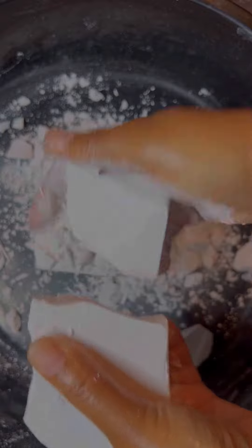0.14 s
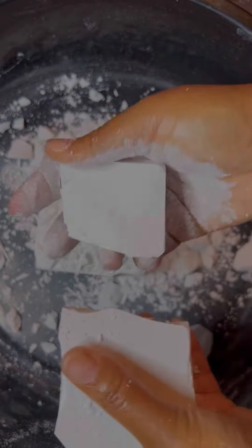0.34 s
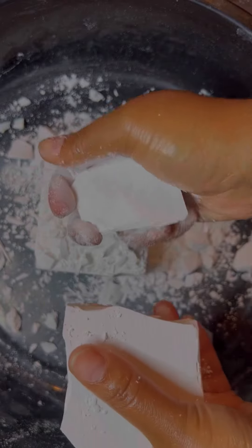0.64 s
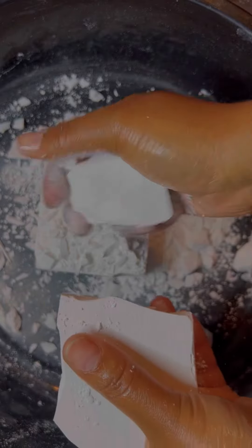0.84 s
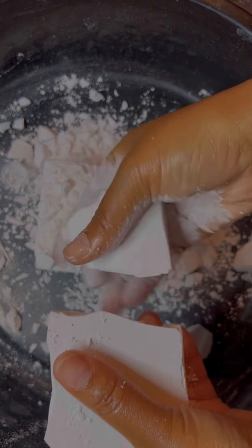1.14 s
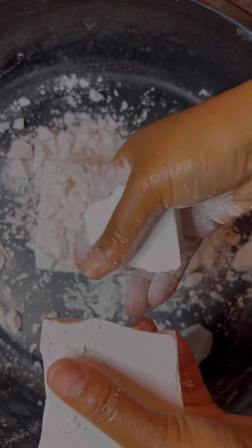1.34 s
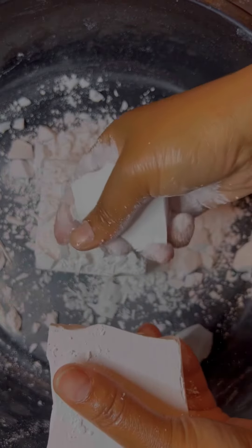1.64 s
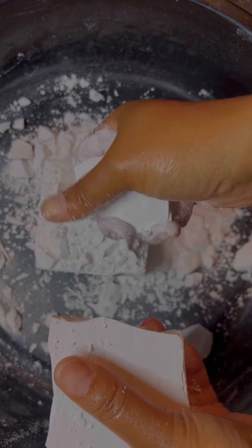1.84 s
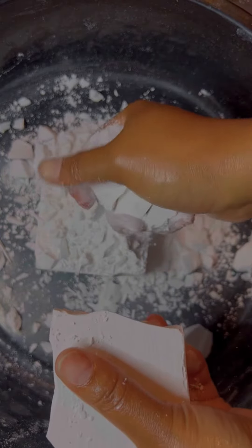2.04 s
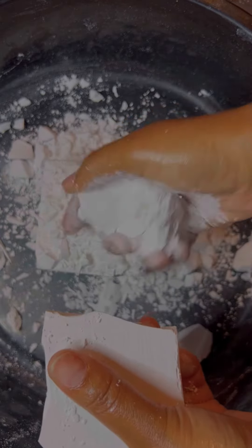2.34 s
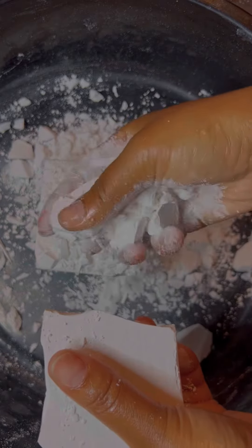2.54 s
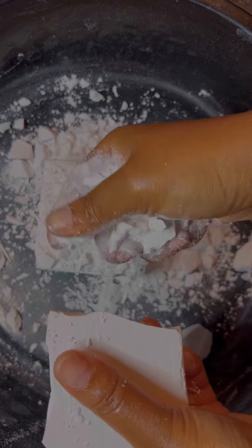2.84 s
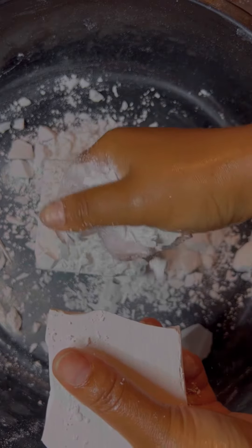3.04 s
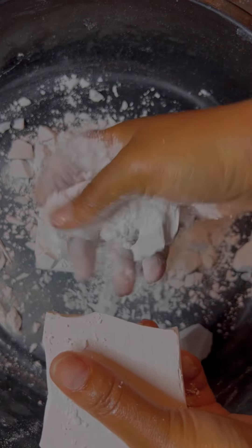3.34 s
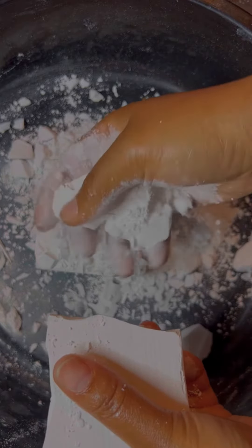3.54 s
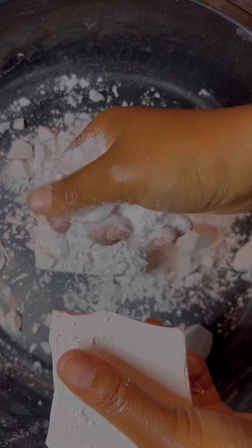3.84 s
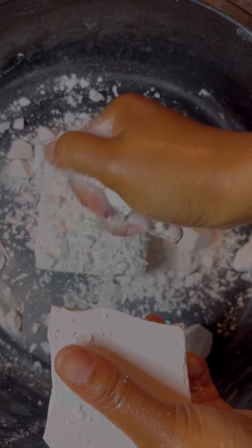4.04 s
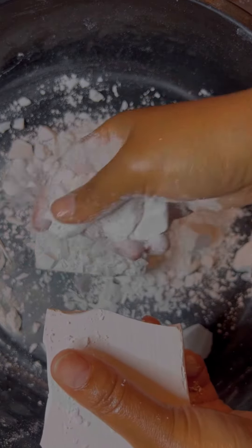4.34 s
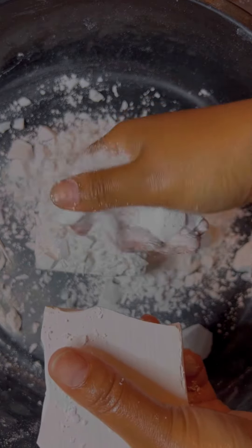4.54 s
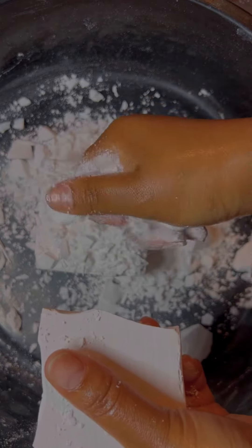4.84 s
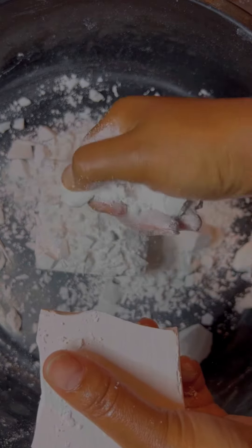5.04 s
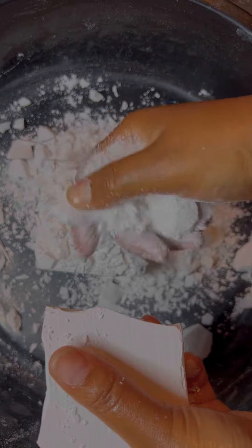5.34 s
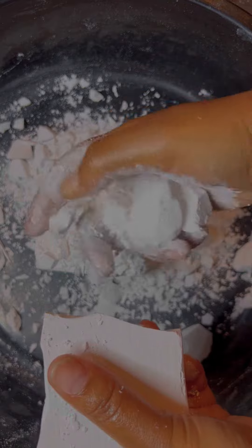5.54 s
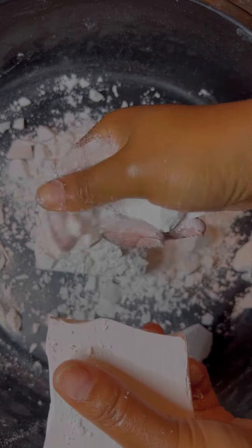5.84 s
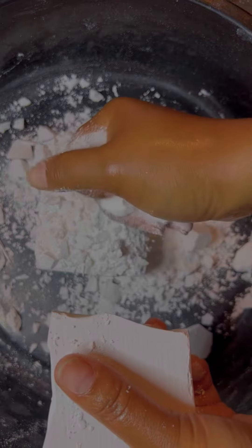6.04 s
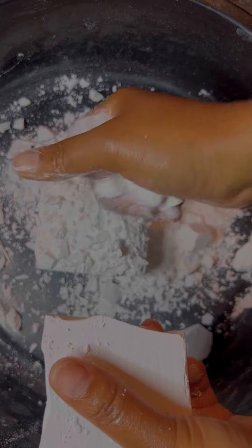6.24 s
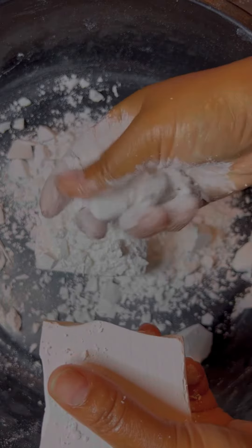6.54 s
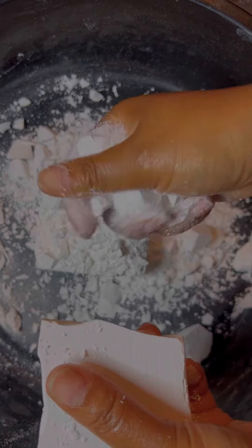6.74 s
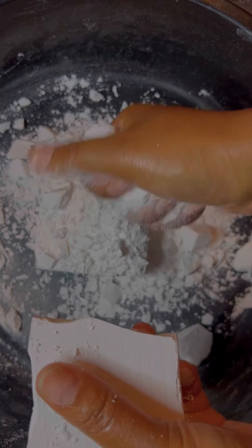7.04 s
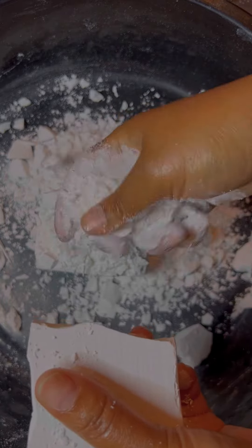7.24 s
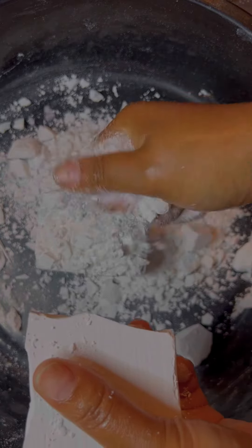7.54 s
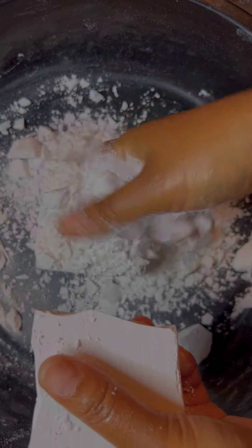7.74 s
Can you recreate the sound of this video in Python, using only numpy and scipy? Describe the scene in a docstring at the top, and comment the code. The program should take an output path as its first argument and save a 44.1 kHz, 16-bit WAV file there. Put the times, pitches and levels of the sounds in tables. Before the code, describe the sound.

Very close in a small quiet room, a hand crushes dry chalk over a basin. Light ticks and faint grinding come first, then a firm snap at one second, low hand thumps past two, crunchy squeezing, and one very loud crack after four seconds. Smaller snaps, pattering crumbs and soft powder hiss follow in uneven bursts to the end.

```python
"""A hand squeezes blocks of gym chalk over a basin, close to a small microphone.
The chalk snaps in short dry cracks, duller breaks and flake ticks: each is a burst of force that rings a piece.
Crumbs patter as many tiny random breaks; powder is finer grains over a smooth noise hiss.
The moving hand and heavy pieces add low noise and damped swings.
The small, quiet room adds an echo, a short ring-out, noise for its air and a faint hum of sines."""
import sys
import numpy as np
from scipy import signal
from scipy.io import wavfile
from scipy.ndimage import uniform_filter1d

SR = 44100
rng = np.random.default_rng(int(sys.argv[2]) if len(sys.argv) > 2 else 0)


def log_audio(samples):
    """Write samples as a 16-bit WAV file to the path given in sys.argv[1]."""
    # one column per channel
    frames = np.atleast_2d(samples).T
    # limit to full scale, then quantise
    limited = np.clip(frames, -1, 1)
    pcm = np.round(limited * 32767).astype(np.int16)
    wavfile.write(sys.argv[1], SR, pcm)


N = 347949
TIME = np.arange(N) / SR  # seconds

# The blocks crack: t/s, body level/dB, snap level/dB, fizz level/dB, ring of the piece f/Hz, fracture decay/ms
CRACKS = [ (.052, -61, -48.5, -48.5, 1530, 1.3), (0.3207, -28, -41, -54, 1670, 2.2),
          (0.4239, -33, -39, -31, 8300, 0.87), (.594, -55, -42.5, -52.5, 2270, 1),
          (0.874, -49, -53.5, -50.5, 870, 2.3), (1.064, -54, -40, -51, 1590, 0.7),
          (1.0733, -53, -44, -45, 1600, 0.67), (1.0846, -14.5, -25.5, -32.5, 636, 0.84),
          (1.0996, -28.5, -44, -52, 362, 3), (1.2824, -47.5, -70, -59, 2040, 1.7),
          (1.318, -55, -60, -52.5, 880, 1.6), (1.8522, -36.5, -43, -40, 2020, 2.2),
          (1.856, -45, -30, -28.5, 2060, 0.29), (1.974, -31, -37, -35.5, 550, 2.2),
          (2.016, -53, -40, -41, 2020, 2.7), (2.1256, -40, -41.5, -50.5, 1170, 1.6),
          (2.293, -36, -48, -57, 433, 18), (2.317, -53, -56, -76, 256, 17),
          (2.5472, -32.5, -43, -52, 1210, 3.4), (2.6182, -39, -36, -27.5, 7040, 0.7),
          (2.903, -48, -47.5, -55, 1580, 3), (2.9978, -67, -53, -66, 2050, 0.97),
          (3.126, -32.5, -42, -47, 1700, 4), (3.4724, -33, -36, -45.5, 1250, 2.4),
          (3.5673, -26.5, -38, -47, 517, 8.5), (3.8455, -61, -41, -34.5, 2270, 0.21),
          (3.8506, -23.5, -26.5, -29, 886, 0.53), (3.8534, -29, -25, -23, 2490, 2.1),
          (4.3241, -44.5, -40, -40, 3900, 1.4), (4.3517, -6, -12.5, -52, 1164, 1.7),
          (4.367, -16, -29, -39, 1290, 5.4), (4.399, -22, -24, -49, 1900, 2),
          (4.4196, -34, -30.5, -42, 2180, 1.4), (4.4498, -17, -43, -39, 1090, 0.85),
          (4.4876, -32.5, -41, -49, 1166, 2.9), (4.497, -32, -42, -43.5, 900, 5.9),
          (4.5195, -33, -33.5, -64, 910, .9), (4.641, -39, -56, -39, 7140, 2.1),
          (4.6723, -39.5, -38, -45, 2260, 3.1), (4.735, -40.5, -30, -44.5, 2720, 2.8),
          (4.8363, -51, -40.5, -47, 3040, 0.88), (4.9528, -57, -54.5, -62, 3730, 0.76),
          (5.0113, -55, -52, -57.5, 3560, 2.3), (5.088, -42, -51.5, -57, 1150, 2.3),
          (5.142, -46.5, -44.5, -54, 1100, 0.7), (5.437, -65, -58.5, -45, 1960, 2.3),
          (5.5559, -33.5, -35.5, -49.5, 1710, 0.57), (5.7128, -48.5, -52, -46.5, 6960, 2.1),
          (5.7523, -39, -45.5, -46.5, 1190, 1.7), (5.8589, -28.5, -24, -29.5, 2080, 0.6),
          (5.8755, -40, -40, -52, 1880, 2.1), (5.947, -26.5, -24.5, -32.5, 1870, 1.7),
          (5.9682, -42, -39.5, -43, 890, 1.8), (6.0723, -54, -39.5, -36, 6730, .5),
          (6.5271, -43.5, -43, -35, 7200, .5), (6.708, -58, -43.5, -50.5, 2090, 3.5),
          (6.7759, -38.5, -41.5, -42, 550, 1.7), (6.815, -40, -46.5, -41.5, 1270, 1.1),
          (6.8462, -37, -48, -39.5, 670, 2.1), (7.2462, -36, -33.5, -43.5, 1700, 1.6),
          (7.296, -37.5, -39, -37, 1210, 2.2), (7.3436, -41, -30.5, -46, 1240, 0.6),
          (7.3864, -21, -33, -39, 618, 0.61), (7.532, -41, -39, -45.5, 1440, 0.83),
          (7.6323, -37, -26, -26.5, 1280, 0.042), (7.6666, -42, -35, -45, 2840, 3.6),
          (7.8355, -29.5, -33, -32.5, 1060, 1.5), (7.8841, -44, -39, -48, 1720, 2)]
# Duller breaks, some ringing on from a loud crack: t/s, body level/dB, ring f/Hz, fracture decay/ms
DULL_BREAKS = [(1.05, -40, 594, 4.8), (1.088, -21, 1060, 1.7), (1.151, -40, 830, 6),
               (1.456, -46.5, 445, 1.6), (3.5516, -36.5, 1250, 5.1), (3.5636, -24, 830, 5.5),
               (3.737, -36.5, 670, 2.1), (4.4543, -28.5, 1190, 1.2), (4.5947, -34, 815, 1.8),
               (4.6067, -37.5, 1150, 2), (5.569, -37, 1210, 0.65), (6.0421, -46, 1950, 0.63),
               (6.501, -26.5, 1090, 1.2), (6.877, -42, 810, 1.4), (7.3757, -27, 550, 7.3),
               (7.513, -40, 1520, 2.6), (7.5752, -41.5, 1700, 2.3), (7.738, -39, 1190, 3.5),
               (7.792, -32, 850, 4.1), (7.8288, -27, 590, 1.5), (7.8599, -33, 1150, 6.3)]
DULL_SNAP_DB, DULL_FIZZ_DB = -16.5, -31  # relative to the body of the dull break
# Thin flakes chip off with a high tick: t/s, fizz level/dB
TICKS = [(0.4286, -33), (0.4361, -40), (0.723, -55.5), (1.239, -51.5), (1.4266, -53), (1.984, -43),
         (2.025, -47), (2.7136, -35.5), (2.8645, -48.5), (4.2028, -51), (4.579, -45), (5.7922, -40.5),
         (5.9613, -40), (6.0467, -47.5), (6.0542, -43), (6.0693, -42), (6.5615, -37), (6.6703, -40),
         (6.761, -44), (6.9047, -44.5), (7.233, -44)]
TICK_BODY_DB, TICK_SNAP_DB = -19.5, -9.5  # relative to the fizz of the tick
TICK_HZ, TICK_MS = 7500, 0.75  # ring and fracture decay, shared by all ticks
# Colour of every crack, dull break and tick: f/Hz, relative level/dB
CHALK_COLOUR = [(130, 13.5), (400, 3), (750, 1), (1150, 1), (1400, 0.5), (1700, 3), (2400, 5.5), (3100, -2),
                (4000, -4), (5200, -5), (7200, -1.5), (9000, -1), (11500, -6), (16000, -19)]

# Fingers grind, or debris spills after a big break:
# full strength t/s, hold/s, coarse crumbs level/dB, fine powder level/dB (before trims)
CRUMBLES = [(0.025, 0.2, -61, -61.5), (0.269, 0.2, -50.5, -64.5), (0.534, 0.025, -60, -63.5),
            (0.812, 0.034, -79, -63), (1.072, 0.01, -40.5, -57), (1.275, 0.17, -68, -65),
            (1.66, 0.32, -59.5, -61.5), (1.933, 0.16, -60.5, -56.5), (2.286, 0.06, -42, -54),
            (2.439, 0.22, -46.5, -54), (2.804, .26, -55.5, -65), (3.164, 0.047, -53, -78),
            (3.265, 0.11, -49.5, -61.5), (3.443, 0.38, -47.5, -60), (3.846, 0.0068, -38, -42.5),
            (3.96, 0.088, -70, -75), (4.169, 0.026, -48.5, -57.5), (4.357, 0.0055, -27, -39.5),
            (4.466, 0.23, -48.5, -63), (4.728, 0.0044, -45.5, -49.5), (4.886, 0.1, -55.5, -67.5),
            (5.189, 0.13, -59.5, -70), (5.455, 0.055, -66, -64.5), (5.547, 0.006, -38.5, -64),
            (5.64, 0.2, -70, -72), (5.747, 0.096, -49.5, -65), (5.838, .005, -47, -51),
            (5.943, 0.013, -46, -54), (6.036, 0.017, -63, -60), (6.199, 0.034, -57, -59.5),
            (6.397, 0.042, -56.5, -61), (6.498, 0.044, -43, -53), (6.662, 0.08, -50, -55),
            (6.807, .08, -46, -56), (7.036, 0.24, -69, -66.5), (7.23, 0.15, -43.5, -54.5),
            (7.397, 0.18, -42, -54), (7.632, 0.097, -46.5, -56), (7.833, 0.064, -42, -59)]
# Each one builds, eases while held, then the debris settles
BUILD_S, EASE_DB_PER_S, SETTLE_DB_PER_S = 0.024, 18.5, 132.5
REST_CRUMBS_DB, REST_POWDER_DB = -74, -72  # faint trickle in between, before trims
# Colour of the coarse crumbs: f/Hz, relative level/dB
CRUMB_COLOUR = [(60, -15), (150, 5.5), (300, -7), (520, 1.5), (750, -6), (1200, -3.5), (1450, -14),
                (2200, -6), (3200, -20), (6000, -23.5), (16000, -47.5)]
# Colour of the fine powder: f/Hz, relative level/dB
POWDER_COLOUR = [(900, -39.5), (1600, -1.5), (2300, 3), (3200, -9), (3900, -3), (5200, -9), (7300, -1),
                 (8100, -5), (9000, 1.5), (9900, -8.5), (10600, -2), (12000, -15), (16000, -12)]

# The hand shifts and stirs the air: full swing t/s, hold/s, level/dB (before a trim)
MOVES = [(1.1, 0.036, -34.5), (1.4, .2, -44), (2.16, 0.14, -43), (2.33, .14, -22), (2.58, 0.03, -26),
         (3.13, 0.13, -47), (3.58, 0.098, -31.5), (4.38, 0.093, -30.5), (5.1, 0.034, -46),
         (5.57, 0.03, -44), (6.43, 0.16, -37.5), (6.67, 0.019, -39), (7.26, 0.23, -33), (7.75, .14, -36.5)]
# A move builds, slows and stops, over a resting rumble (before a trim)
SWING_S, SLOW_DB_PER_S, STOP_DB_PER_S, REST_RUMBLE_DB = 0.067, 9, 86.5, -48.5
# Low bumps of the hand and heavy pieces: t/s, level before fading/dB, starting f/Hz, decay/s
BUMPS = [(1.088, -35, 178, 0.017), (2.31, -5.5, 43.6, 0.027), (2.322, -7, 96, 0.007),
         (2.384, -9.5, 51.7, 0.019), (2.413, -18.5, 70, 0.047), (2.463, -20, 76.4, 0.036),
         (3.123, -31.5, 71.6, 0.016), (3.561, -14.5, 93, 0.01), (3.565, -23, 182, 0.018),
         (3.581, -24.5, 66, 0.051), (3.852, -22, 122, 0.0042), (4.353, -27, 190, 0.028),
         (4.374, -16.5, 74, 0.027), (7.698, -31.5, 151, 0.024)]
# Colour of the hand's rumble: f/Hz, relative level/dB
RUMBLE_COLOUR = [(10, -7), (25, 7.5), (48, 1), (70, -7), (110, -10), (180, -21.5), (300, -32), (700, -65)]

# Colour of the quiet room air: f/Hz, relative level/dB
AIR_COLOUR = [(50, -2.5), (130, 2), (250, -7), (480, -12), (700, -11.5), (1400, -22.5), (2200, -36.5),
              (3300, -34.5), (9000, -28), (16000, -32.5)]
# Steady hum tones: f/Hz, rms level/dB
HUM = [(118, -69), (357, -76), (474, -69)]
# Ring-out of basin and room: f/Hz, time to fall by 60 dB/s
RING_OUT = [(200, 0.33), (1200, 0.27), (4000, 0.13), (14000, 0.24)]
EDGE_HZ = 16100  # upper band limit of the microphone signal


def amp(db):
    """Turns decibels into gain."""
    return 10 ** (np.asarray(db) / 20)


def unit(x):
    """Scales a sound to an rms of 1."""
    return x / np.sqrt(np.mean(x ** 2) + 1e-20)


def read(points, hz):
    """Reads a table of values between its points, on a log-frequency axis."""
    f, value = np.transpose(points)
    return np.interp(np.log(hz + 1), np.log(f + 1), value)


def add(mix, s, sound):
    """Mixes a sound in at time s, cut off at the end of the mix."""
    part = mix[max(round(s * SR), 0):][:len(sound)]
    part += sound[:len(part)]


def impulse(points, size=2048):
    """Makes a click with the given spectrum that starts at once (minimum phase)."""
    hz = abs(np.fft.fftfreq(size, 1 / SR))
    log_gain = np.log(amp(read(points, hz)))
    spectrum = np.exp(np.conj(signal.hilbert(log_gain)))
    return np.fft.ifft(spectrum).real[:size // 2]


def colour(x, points, size=2048):
    """Gives a sound the listed spectrum, at an rms of 1."""
    return unit(signal.oaconvolve(x, impulse(points, size))[:len(x)])


def band(lo_hz, hi_hz):
    """Designs a filter that keeps one range of frequencies."""
    return signal.butter(3, [lo_hz, min(hi_hz, SR / 2 - 1)], "bandpass", fs=SR, output="sos")


def gestures(rows, attack_s, held_db_per_s, release_db_per_s, rest_db):
    """Gain over time: each (t, hold, dB) swells up to t, sags while held and dies away, over a resting level."""
    power = np.full(N, amp(rest_db) ** 2)
    for s, hold, db in rows:
        t = TIME[:2 * SR] - attack_s
        swell = np.minimum(1 + t / attack_s, 1)
        fall_db = held_db_per_s * np.clip(t, 0, hold) + release_db_per_s * np.maximum(t - hold, 0)
        add(power, s - attack_s, (swell * amp(db - fall_db)) ** 2)
    return np.sqrt(power)


def background(air_db=-62, waver=0.15):
    """Room air is coloured noise; the hum is steady sines whose phase wavers (waver: radians rms)."""
    out = amp(air_db) * colour(rng.standard_normal(N), AIR_COLOUR)
    for hz, db in HUM:
        slow_noise = uniform_filter1d(rng.standard_normal(N), size=2000)
        drift = waver * unit(uniform_filter1d(slow_noise, size=1000))
        out += amp(db) * unit(np.sin(2 * np.pi * hz * TIME + drift))
    return out


def handling(rumble_trim_db=-2, sag=0.24):
    """Moving hands rumble; each bump is a damped swing whose pitch sags by up to 24% as the flesh relaxes."""
    motion = gestures(MOVES, SWING_S, SLOW_DB_PER_S, STOP_DB_PER_S, REST_RUMBLE_DB)
    rumble = colour(rng.standard_normal(N), RUMBLE_COLOUR, size=16384)
    out = amp(rumble_trim_db) * motion * rumble
    t = TIME[:SR // 2]
    for s, db, hz, decay in BUMPS:
        fade = np.exp(-t / decay)
        onset = 1 - np.exp(-t * hz * 4)
        turns = np.cumsum(hz * (1 - sag * (1 - fade))) / SR
        add(out, s, -amp(db) * np.sin(2 * np.pi * turns) * fade * onset)
    return out


def crumbling(rest_db, column):
    """How strongly the crumbs (column 2) or the powder (column 3) grind or spill over time."""
    rows = [(row[0], row[1], row[column]) for row in CRUMBLES]
    return gestures(rows, BUILD_S, EASE_DB_PER_S, SETTLE_DB_PER_S, rest_db)


def fracture(t, decay_ms, first_db=15, lumpy_db=4, after_db=-19, after_times=3.1):
    """One sharp break, a dying run of smaller breaks, then a weak trickle of debris that fades more slowly."""
    lumps = amp(lumpy_db * np.clip(rng.standard_normal(len(t)), -2, 2))
    run = rng.standard_normal(len(t)) * lumps
    age = 1000 * t / decay_ms  # in decay times
    force = run * (np.exp(-age) + amp(after_db) * np.exp(-age / after_times))
    force[0] += amp(first_db)
    return force


def rung(force, hz, cycles, ring_db):
    """Adds the few cycles with which a piece of chalk rings; they fade by 1/e in the given cycles."""
    t = TIME[:len(force)]
    mode = np.exp(-t * hz / cycles) * np.cos(2 * np.pi * hz * t)
    mode *= 2 * hz / (cycles * SR)  # evens out the strength of long and short rings
    return force + amp(ring_db) * signal.fftconvolve(force, mode)[:len(t)]


def grains(per_s, spread_db, decay_ms, lo_hz, hi_hz, ring_db, count=32):
    """Bits break at random, each a tiny fracture with one of 32 rings; a few are much louder."""
    t, out = TIME[:SR // 50], np.zeros(N)
    hits = np.flatnonzero(rng.random(N) < per_s / SR)
    gains = amp(spread_db * np.minimum(rng.exponential(1, len(hits)), np.pi))
    kinds = rng.integers(0, count, len(hits))
    shapes = []
    for hz in np.geomspace(lo_hz, hi_hz, count):
        force = fracture(t, decay_ms * rng.uniform(0.72, 2.4), first_db=5)
        shapes.append(unit(rung(force, hz, 4.1, ring_db)))
    for hit, gain, kind in zip(hits, gains, kinds):
        add(out, hit / SR, gain * shapes[kind])
    return unit(out)


def crumbs(trim_db=-1):
    """Coarse bits rub in the fist and patter onto the heap, as low-ringing random breaks."""
    bits = grains(per_s=230, spread_db=5.5, decay_ms=1.0, lo_hz=510, hi_hz=1870, ring_db=9.0)
    return amp(trim_db) * crumbling(REST_CRUMBS_DB, column=2) * colour(bits, CRUMB_COLOUR)


def powder(crackle_trim_db=2, hiss_trim_db=-4, hiss_rest_db=-80):
    """Fine grit crackles over the smooth hiss of sliding powder; the hiss nearly stops at rest."""
    grit = grains(per_s=350, spread_db=8.5, decay_ms=1.1, lo_hz=2550, hi_hz=13000, ring_db=3.5)
    crackle = crumbling(REST_POWDER_DB, column=3) * colour(grit, POWDER_COLOUR)
    hiss = crumbling(hiss_rest_db, column=3) * colour(rng.standard_normal(N), POWDER_COLOUR)
    return amp(crackle_trim_db) * crackle + amp(hiss_trim_db) * hiss


def cracks(cycles=2.8, ring_db=6, bass_share=0.3, most_bass_hz=420):
    """Each crack, dull break or tick is a fracture that rings its piece; higher-ringing pieces give less bass."""
    t, out = TIME[:SR // 20], np.zeros(N)
    early = int(0.008 * SR)  # levels are set over the first 8 ms
    chalk = impulse(CHALK_COLOUR, size=512)
    snap_band, fizz_band = band(1720, 4300), band(4800, 17000)
    dull = [(s, db, db + DULL_SNAP_DB, db + DULL_FIZZ_DB, hz, ms) for s, db, hz, ms in DULL_BREAKS]
    ticks = [(s, db + TICK_BODY_DB, db + TICK_SNAP_DB, db, TICK_HZ, TICK_MS) for s, db in TICKS]
    for s, body_db, snap_db, fizz_db, hz, decay_ms in CRACKS + dull + ticks:
        force = signal.fftconvolve(fracture(t, decay_ms), chalk)[:len(t)]
        piece = rung(force, hz, cycles, ring_db)
        body_band = band(min(bass_share * hz, most_bass_hz), 1373)
        for sections, db in ((body_band, body_db), (snap_band, snap_db), (fizz_band, fizz_db)):
            part = signal.sosfilt(sections, piece)
            add(out, s, amp(db) * part / np.std(part[:early]))
    return out


def room(x, wet_db=-22, basin_db=-13, basin_s=0.0029):
    """The basin throws back one early echo; a tail of fading noise adds a faint, short ring-out."""
    echo = np.r_[np.zeros(round(basin_s * SR)), x][:N]
    x = x + amp(basin_db) * echo
    hz, t, z = signal.stft(rng.standard_normal(SR // 2), SR, nperseg=256)
    fade = amp(-60 * t / read(RING_OUT, hz)[:, None])
    tail = signal.istft(z * fade, SR, nperseg=256)[1]
    tail[:SR // 250] = 0  # the tail waits 4 ms
    return x + amp(wet_db) * signal.fftconvolve(x, tail / np.linalg.norm(tail))[:N]


def scene():
    """Chalk sounds in the room, over handling noise and room tone."""
    chalk = cracks() + crumbs() + powder()
    return (room(chalk) + handling() + background())[None]


def record(dry):
    """An overloaded microphone flattens the loudest peaks; then the highest treble is cut off."""
    ceiling = 0.71
    low_pass = signal.firwin(301, EDGE_HZ, window=("kaiser", 9), fs=SR)
    return signal.oaconvolve(np.clip(dry, -ceiling, ceiling), low_pass[None], "same")


dry = scene()
out = record(dry)
log_audio(out)
```